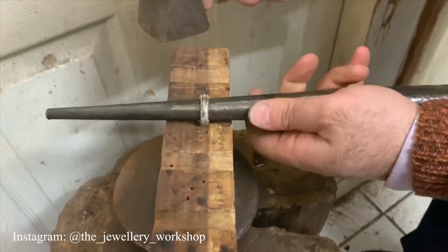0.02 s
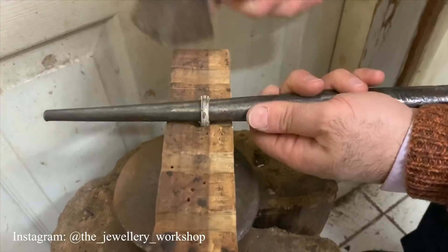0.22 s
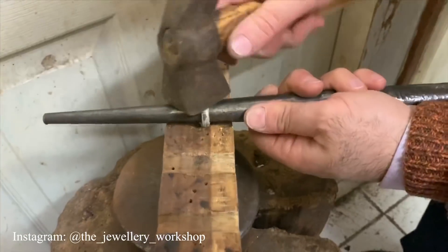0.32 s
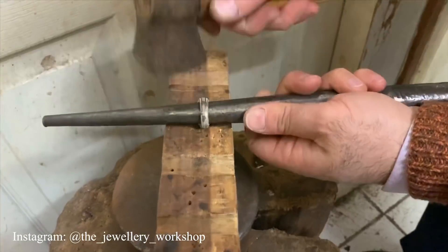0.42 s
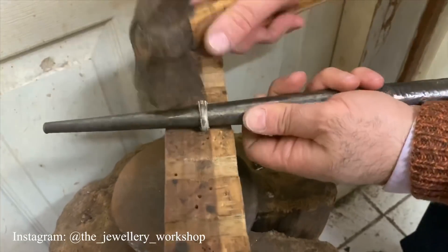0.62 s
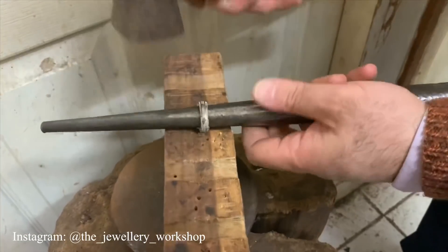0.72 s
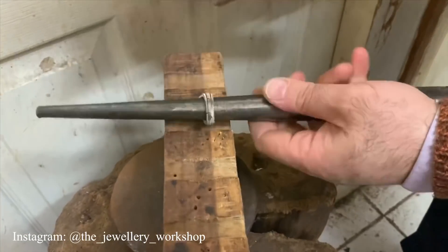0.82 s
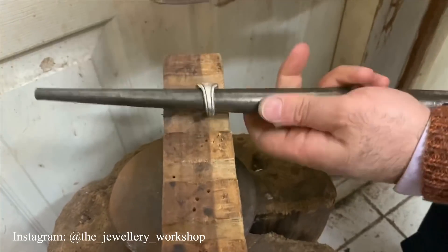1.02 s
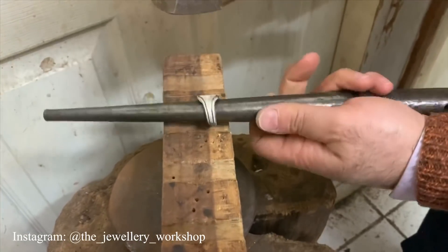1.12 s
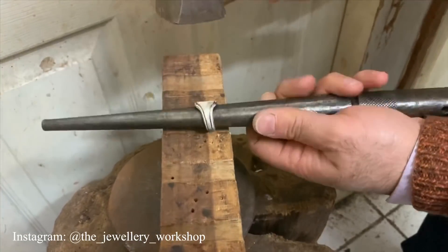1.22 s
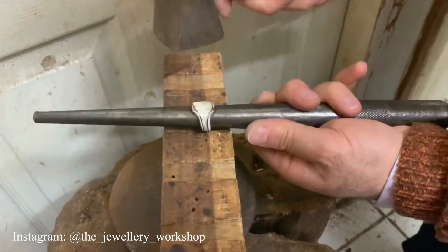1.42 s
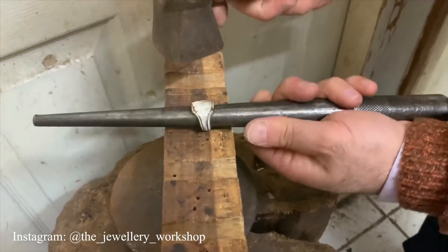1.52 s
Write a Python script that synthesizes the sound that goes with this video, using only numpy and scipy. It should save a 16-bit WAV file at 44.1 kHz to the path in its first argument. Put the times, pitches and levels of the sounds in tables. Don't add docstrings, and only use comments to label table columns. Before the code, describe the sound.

Two loud, sharp hammer blows on a ring on a steel mandrel, each with a quick rebound and woody boom, then soft dull knocks as it is turned; small quiet workshop, close stereo microphones.

```python
import sys
import numpy as np
from scipy import signal
from scipy.fft import rfft, irfft, next_fast_len
from scipy.io import wavfile
from scipy.ndimage import map_coordinates

SR = 44100
rng = np.random.default_rng(int(sys.argv[2]) if len(sys.argv) > 2 else 0)


def output_pcm(signal):
    pcm = np.clip(np.atleast_2d(signal).T, -1, 1) * 32767
    wavfile.write(sys.argv[1], SR, np.round(pcm).astype(np.int16))


def invert_db(x):
    u = np.asarray(x, float) / 20
    return 10 ** u


N = 68355


def unit(x):
    return x / np.sqrt(np.mean(x ** 2) + 1e-20)


def along(points, hz):
    f, value = np.transpose(points)
    return np.interp(np.log(hz + 1), np.log(f + 1), value)


def filtered(x, response):
    n = x.shape[-1]
    m = next_fast_len(n + 8192)
    return irfft(rfft(x, m) * response(np.fft.rfftfreq(m, 1 / SR)), m)[..., :n]


def pair(size, gain, alike):
    def turn(hz):
        return np.arccos(np.clip(alike(hz), -1, 1)) / 2

    noise = rng.standard_normal((2, size))
    mid, side = filtered(noise, lambda hz: gain(hz) * [np.cos(turn(hz)), np.sin(turn(hz))])
    return unit(np.array([mid + side, mid - side]))


# (frequency [Hz], density [dB per Hz])
AIR_COLOUR = [(15, -55), (25, -25), (108, 0.5), (245, -23), (304, -13), (524, -35.5), (687, -20.5),
              (8600, -31.5), (16500, -52)]
# (time [s], level [dB])
AIR_SWELL = [(0, 0), (.9, 0.5), (1.1, -2), (1.299, -2), (1.42, 3), (1.55, -1.5)]
# (frequency [Hz], width [Hz], level [dB])
HUM_BANDS = [(72, 14, -74.5), (92.6, 8.8, -77), (127, 37, -86.5), (183, 10, -80.5), (310, 8, -90.5)]
# (frequency [Hz], width [Hz], level [dB])
HISS_BANDS = [(8620, 300, -90.5), (13200, 1300, -94.5)]
# (frequency [Hz], likeness [-1 to 1])
AIR_ALIKE = [(60, -0.022), (240, 0.77), (950, -0.47), (3770, -0.63), (15000, 0.21)]


def air():
    def alike(hz):
        return along(AIR_ALIKE, hz)

    bands = np.zeros((2, N))
    for centre, width, db in HUM_BANDS + HISS_BANDS:
        bands += invert_db(db) * pair(N, lambda hz: 1 / (1 + ((hz - centre) / width) ** 4), alike)
    swell_db = np.interp(np.arange(N) / SR, *np.transpose(AIR_SWELL))
    return invert_db(-69 + swell_db) * pair(N, lambda hz: invert_db(along(AIR_COLOUR, hz)), alike) + bands


WAVER_RAD, WAVER_RATE = 0.83, 92


def ring(modes, t, cycles, spread):
    hz, db, t60 = np.transpose(modes)[..., None]
    lead = spread * rng.uniform(-0.82, 1, hz.shape) * np.minimum(hz / 900, 1)
    knots = rng.standard_normal(size=(len(hz), 128))
    waver = np.array([np.interp(t * WAVER_RATE, np.arange(len(k)), k - k[0]) for k in knots])
    envelope = invert_db(db - 60 * t / t60) * (1 - np.exp(-t * hz / cycles)) ** 2
    phase = 2 * np.pi * hz * t + WAVER_RAD * waver * np.minimum(hz / 300, 1)
    turning = np.exp(1j * phase) * envelope
    left = np.exp(1j * lead.T) @ turning
    right = np.exp(-1j * lead.T) @ turning
    return np.array([left, right])[:, 0].imag


# (frequency [Hz], t60 [s])
ROOM_DECAY = [(100, 0.62), (500, 0.2825), (1500, 0.27), (4000, 0.28), (9000, 0.2557), (15000, 0.18),
              (16200, .06)]
# (frequency [Hz], level [dB])
ROOM_COLOUR = [(100, 3.5), (600, 4.5), (3000, 3.5), (15000, -8.5)]
# (frequency [Hz], likeness [0 to 1])
ROOM_LIKENESS = [(100, .9), (400, 1), (1200, .05)]
ROOM_DB, ROOM_GAP_S = -14, 0.004


def room(x):
    noise = pair(SR // 2, lambda hz: 1, lambda hz: along(ROOM_LIKENESS, hz))
    hz, t, z = signal.stft(noise, SR, nperseg=256)
    level_db = along(ROOM_COLOUR, hz)[:, None] - 60 * t / along(ROOM_DECAY, hz)[:, None]
    tail = signal.istft(z * invert_db(level_db), SR, nperseg=256)[1]
    tail = np.pad(tail / np.linalg.norm(tail[0]), ((0, 0), (round(ROOM_GAP_S * SR), 0)))
    return x + invert_db(ROOM_DB) * signal.fftconvolve(x[:1], tail, axes=1)[:, :x.shape[1]]


def add(out, s, x):
    part = out[:, round(s * SR):][:, :x.shape[1]]
    part += x[:, :part.shape[1]]


# (time [s], peak level [dB], contact spot [0 to 1], roar length [s], stump level [dB])
HAMMER_BLOWS = [
    (.003, -63.5, 0.15, 0.0067, -4),
    (0.2493, -11.5, 0, 0.00468, 5),
    (.254, -15.5, 0.02, 0.00479, -21),
    (.2693, -24.5, 1, 0.00533, -7),
    (0.4818, -9.5, 1, 0.0059, 1),
    (0.4944, -22, 1, 0.00355, -12),
]
# (frequency [Hz], level at spot 0 [dB], level at spot 1 [dB], t60 [s])
STEEL_MODES = [(751.84, -17.5, -9.5, 0.089), (820.1, -10, -9.5, 0.16), (974.7, -12, -10.5, 0.097),
               (1114.4, -10.5, -9.5, .04), (1614.8, -19, -16.5, .16), (1768, -14.5, -13, 0.055),
               (2097, -13, -11.5, 0.082), (2291, -3.5, -10.5, 0.071), (2388.7, -13.5, -11, 0.052),
               (4107.3, -9, -12, .07), (4242.4, -9, -13, 0.1188), (6580, -19.5, -25, 0.095),
               (9550, -1, -8, 0.033), (13189, -3.5, -12, 0.018)]
# (frequency [Hz], level [dB], t60 [s])
STUMP_MODES = [(105.55, -23.5, 0.41), (131.95, -27, 0.31), (186.59, -21.5, .4), (240, -7.5, 0.044),
               (279.3, -14, 0.071), (315.2, -4.5, 0.0341), (410.32, -5, .03)]
# (frequency [Hz], density [dB per Hz])
CRACK_COLOUR = [(150, -21.5), (450, -5), (2310, -11), (3160, -19.5), (4160, -16), (7370, -17), (9510, -14),
                (15800, -17)]
STUMP_CYCLES = 1.2
CLICK_DB, CLICK_T60_S = -6, 0.0059


def hammer():
    out, t = np.zeros((2, N)), np.arange(SR // 2) / SR
    crack_alike = [(200, 0.973), (600, 0.93), (1500, 0.035), (9000, 0.13)]  # (frequency [Hz], likeness)
    for s, db, spot, roar_s, stump_db in HAMMER_BLOWS:
        modes = [(hz, a + spot * (b - a), t60) for hz, a, b, t60 in STEEL_MODES]
        steel = ring(modes, t, 1, 0.93)
        shape = np.exp(-t / roar_s) + invert_db(CLICK_DB - 60 * t / CLICK_T60_S)
        crack = shape * pair(len(t), lambda hz: invert_db(along(CRACK_COLOUR, hz)),
                             lambda hz: along(crack_alike, hz))
        boom = invert_db(stump_db) * ring(STUMP_MODES, t, STUMP_CYCLES, 1.0)
        add(out, s, invert_db(db) * room(steel + crack + boom))
    return out


# (time [s], peak level [dB], thud level [dB], ring level [dB])
SOFT_KNOCKS = [
    (.763, -50, 5, -9),
    (1.053, -40, -12.5, -4.5),
    (1.084, -33.5, -11, -0.5),
    (1.18, -59, 9, -11.5),
    (1.223, -66.5, 18, -25),
    (1.268, -68.5, 15.5, -13.5),
]
# (frequency [Hz], level [dB], t60 [s])
RESTING_MODES = [(386.8, -9.5, 0.0471), (617.3, -12.5, 0.045), (764.5, -7.5, 0.083), (936.6, -5.5, 0.0434),
                 (1360, -28.5, 0.066), (1606, -17.5, 0.1984), (2156, -16.5, 0.097)]
# (frequency [Hz], density [dB per Hz])
PUFF_COLOUR = [(100, -9), (300, -5), (1010, 0.5), (1340, -19), (2300, -38.5), (4000, -62.5), (8000, -77.5)]
# (time [s], length [s], level [dB])
RUB_STROKES = [
    (0.767, 0.048, -58.5),
    (1.163, 0.0615, -54.5),
    (1.327, 0.103, -80.5),
]
# (frequency [Hz], density [dB per Hz])
RUB_COLOUR = [(120, -37.5), (350, 6.5), (900, -4.5), (1300, -21), (3000, -53.5)]
PUFF_DB, PUFF_T60_S = 2, 0.0174
PUSH_DB, PUSH_S = 6, 0.00037
DULL_HZ = 3333


def knocks():
    out, t = np.zeros((2, N)), np.arange(SR // 2) / SR
    for s, db, thud_db, ring_db in SOFT_KNOCKS:
        modes = [(hz, level + ring_db * min(hz / 1500, 1) + rng.normal(0, 2.48), t60)
                 for hz, level, t60 in RESTING_MODES]
        mandrel = ring(modes, t, 0.283, 1.0)
        puff = invert_db(PUFF_DB - 60 * t / PUFF_T60_S) * pair(
            len(t), lambda hz: invert_db(along(PUFF_COLOUR, hz)), lambda hz: 0.6 + 0 * hz)
        damped_stump = [(hz, level, t60 * 0.62) for hz, level, t60 in STUMP_MODES]
        thud = invert_db(12 + thud_db) * ring(damped_stump, t, STUMP_CYCLES, 0.27)
        u = t / PUSH_S
        push = invert_db(PUSH_DB) * np.e * u * (1 - u / 2) * np.exp(-u)
        add(out, s, invert_db(db) * room(mandrel + puff + thud + push))
    for s, length, db in RUB_STROKES:
        grain_db = 3.72 * map_coordinates(rng.standard_normal(size=99), [t * 90])
        stroke = np.sin(np.pi * np.minimum(t / length, 1)) ** 0.6 * invert_db(grain_db)
        noise = pair(len(t), lambda hz: invert_db(along(RUB_COLOUR, hz)), lambda hz: 0.94 + 0 * hz)
        add(out, s, invert_db(db) * room(stroke * noise))
    return filtered(out, lambda hz: 1 / (1 + 1j * hz / DULL_HZ) ** 4)


# (frequency [Hz], width [Hz], depth [0 to 1])
MICROPHONE_DIPS = [(7248, 540, 0.6), (11720, 550, 0.92)]
LOW_CUT_HZ = 75


def microphone(hz):
    u = 1j * hz / LOW_CUT_HZ
    low_cut = (u * u / (u * u + 0.86 * u + 1)) ** 2
    dips = np.prod([1 - depth * np.exp(-((hz - centre) / width) ** 4)
                    for centre, width, depth in MICROPHONE_DIPS], 0)
    return low_cut * dips / (1 + (hz / 15900) ** 40)


LAG_HZ, LAG_STAGES = 220, 6


def scene():
    blows = filtered(hammer(), lambda hz: ((1j * hz - LAG_HZ) / (1j * hz + LAG_HZ)) ** LAG_STAGES)
    return filtered(blows + knocks(), microphone) + air()


def low_pass(x):
    return signal.sosfilt(signal.butter(12, 16790, fs=SR, output="sos"), x)


SMEAR_DB, SMEAR_S, SMEAR_HZ = -14, 0.007, 8087
TOP_HZ = 16760


def record(dry):
    t = np.arange(SR // 40) / SR
    shadow = rng.standard_normal((2, len(t))) * np.exp(-t / SMEAR_S)
    shadow = shadow / np.linalg.norm(shadow[0])
    ahead = signal.fftconvolve(dry[:, ::-1], shadow, axes=1)[:, :N][:, ::-1]
    smear = filtered(ahead, lambda hz: 1 / (1 + (hz / SMEAR_HZ) ** 30) / (1 + (400 / (hz + 1)) ** 4))
    mix = dry + invert_db(SMEAR_DB) * smear
    return low_pass(filtered(mix, lambda hz: np.clip((TOP_HZ - hz) / 500, 0, 1) ** 2))


dry = scene()
out = record(dry)
output_pcm(out)
```